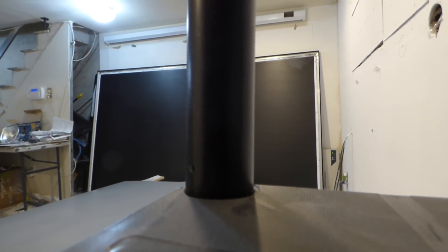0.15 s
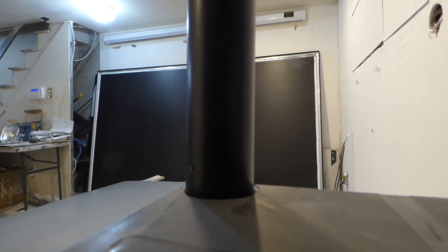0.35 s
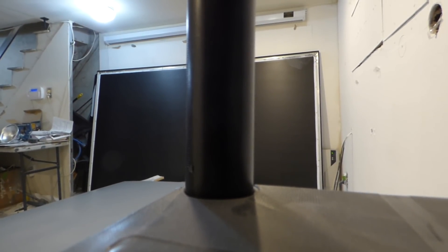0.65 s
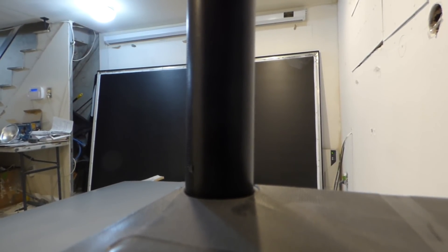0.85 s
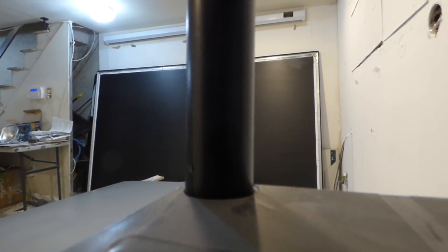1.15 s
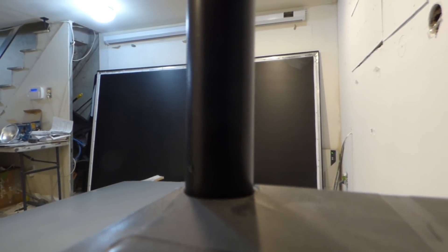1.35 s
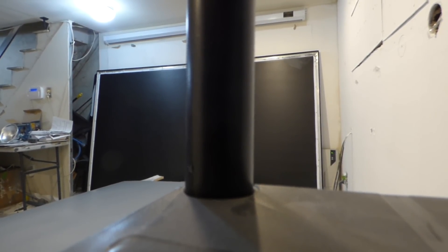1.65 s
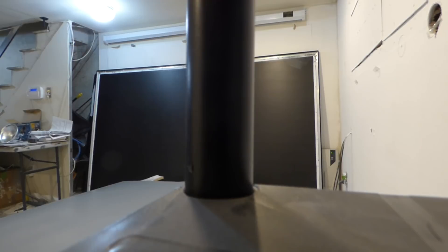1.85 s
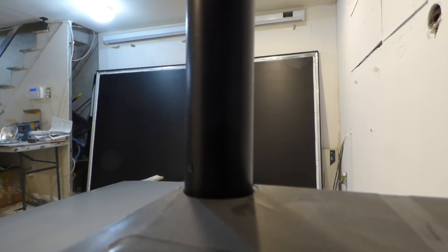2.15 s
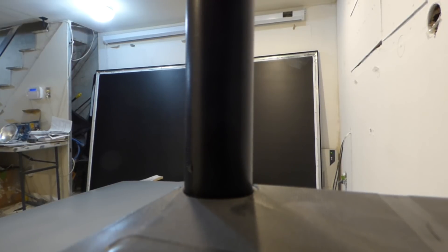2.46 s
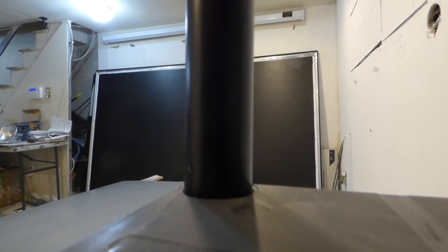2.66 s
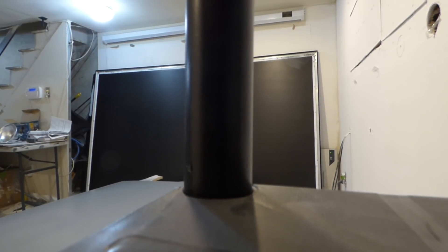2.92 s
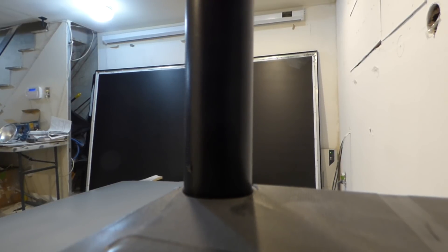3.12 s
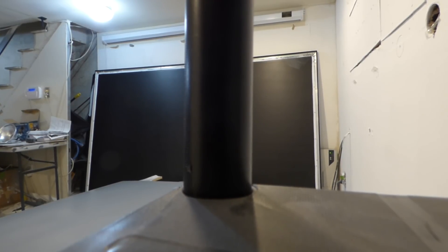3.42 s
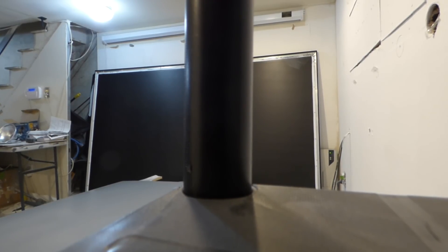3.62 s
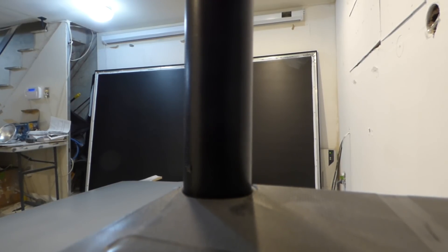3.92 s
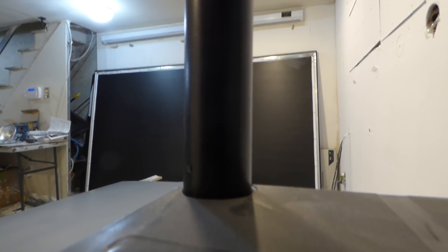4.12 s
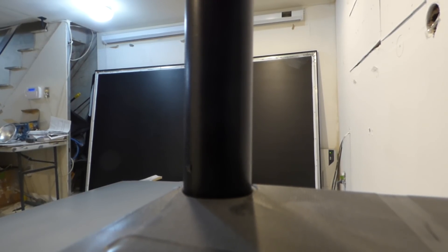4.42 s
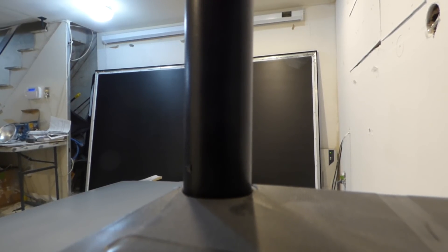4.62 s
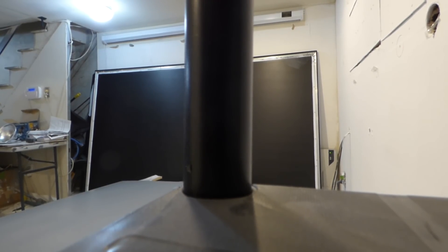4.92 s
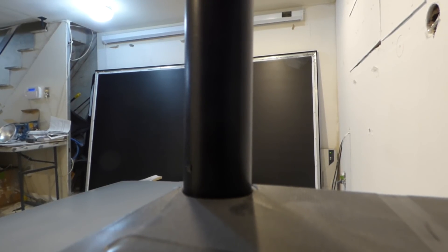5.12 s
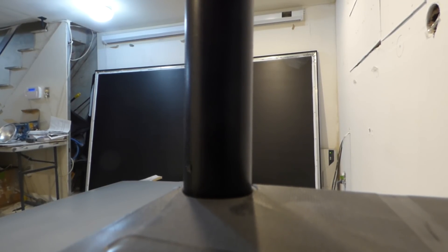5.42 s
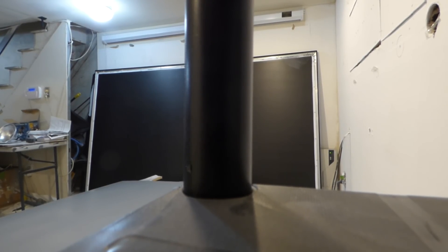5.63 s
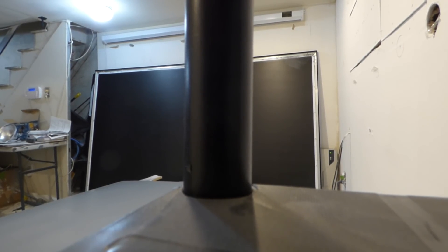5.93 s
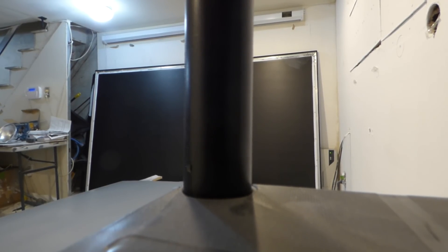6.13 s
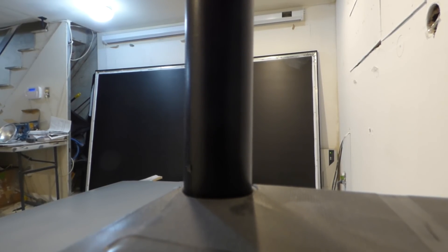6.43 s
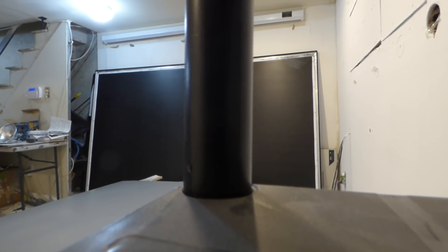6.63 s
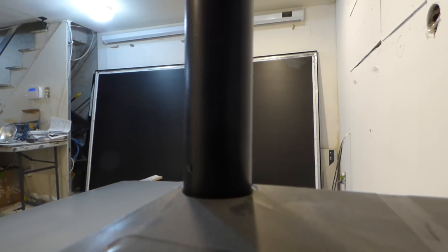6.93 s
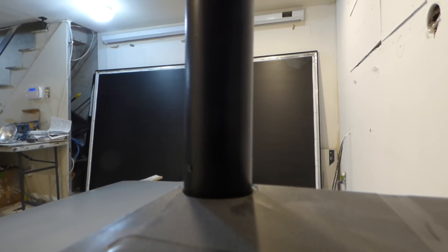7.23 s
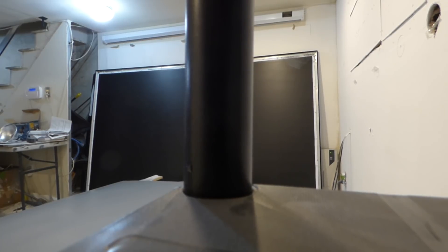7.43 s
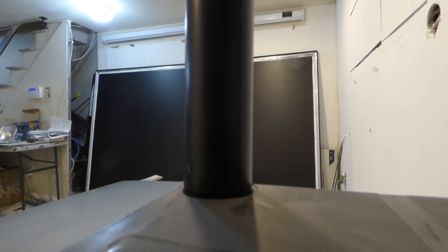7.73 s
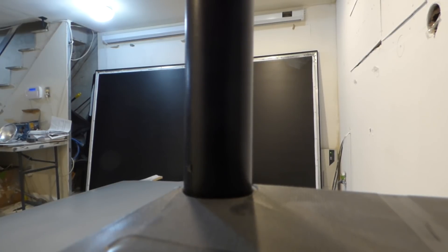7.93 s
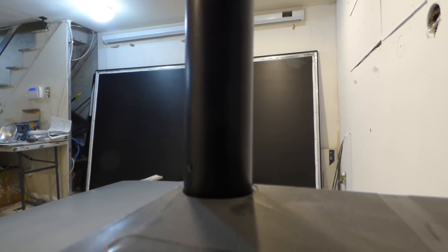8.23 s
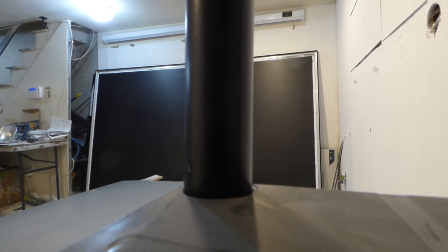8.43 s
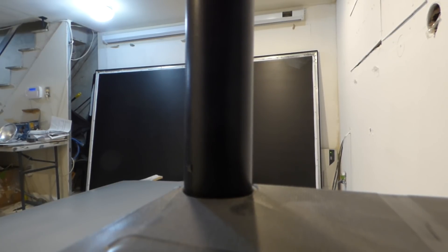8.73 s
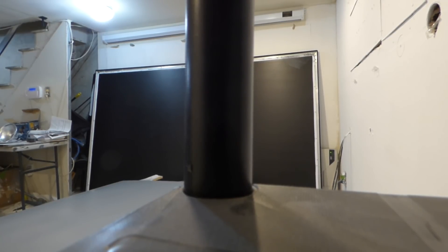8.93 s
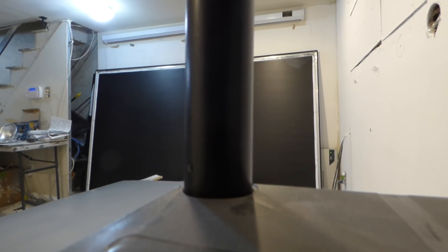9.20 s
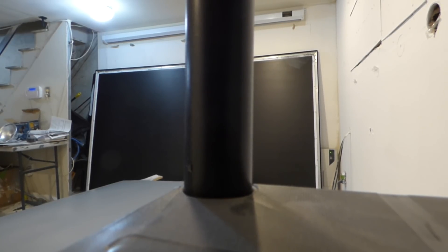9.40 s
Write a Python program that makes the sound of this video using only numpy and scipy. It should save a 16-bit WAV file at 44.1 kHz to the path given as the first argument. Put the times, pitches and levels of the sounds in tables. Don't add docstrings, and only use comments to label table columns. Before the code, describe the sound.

For the first 4.1 seconds it is very quiet in a small workshop: faint microphone hiss, low room murk and close handling. Cloth rustle fades from the start; sharp plastic snaps come near 0.4, 0.66, 1.65 and 2.9 seconds, with tiny crackles between. Soft dull bench knocks fall around 0.55, 0.73 and 0.9, faintly near 1.7-1.85, then more firmly at 3.5, 3.75 and just before 4.0, with a short room echo. At 4.11 a switch clicks, a low thump jolts the housing and rings briefly, with a momentary hum and rapid metallic chirp. The turbine's whine glides up, settling at a steady pitch around 700 hertz by about 5.3 seconds. Almost instantly a loud, bright, hissing air jet takes over, wide in its lower body, gently flickering. It continues to the end around 9.5 seconds, easing only slightly, the whine thin beneath it.

```python
import sys
import numpy as np
from scipy import signal
from scipy.fft import rfft, irfft, next_fast_len
from scipy.io import wavfile
from scipy.ndimage import uniform_filter1d

SR = 44100
rng = np.random.default_rng(int(sys.argv[2]) if len(sys.argv) > 2 else 0)


def transcribe(u):
    v = np.clip(np.atleast_2d(u).T, -1, 1)
    q = np.round(v * 32767).astype(np.int16)
    wavfile.write(sys.argv[1], SR, q)


def ratio(d):
    e = np.asarray(d, float) / 20
    return 10 ** e


N = 421596
T = np.arange(N) / SR
FFT = next_fast_len(N)
HZ = np.fft.rfftfreq(FFT, 1 / SR) + 1e-3
SIDES = np.array([[1], [-1]])
START_S, TOP_SPEED_HZ = 4.113, 714.1


def shape(points):
    hz, db = np.transpose(points)
    return np.interp(np.log(HZ), np.log(hz), db)


def bumps(hz, rows):
    return sum(db / (1 + (2 * (hz - centre) / width) ** 2) for centre, width, db in rows)


def band(x, hz, reach):
    edges = np.clip([hz / reach, hz * reach], 300, 13000)
    return signal.sosfilt(signal.butter(3, edges, "band", fs=SR, output="sos"), x)


def decay(t, t60):
    return np.exp(-np.log(1000) * t / t60)


def ring(hz, t60, rise, turns=0):
    t = T[:int(.6 * SR)]
    return (1 - np.exp(-t / rise)) * decay(t, t60) * np.sin(2 * np.pi * (hz * t + turns))


def walk(rate):
    k = int(SR / rate)
    held = np.repeat(rng.standard_normal(N // k + 1), k)
    return 1.325 * uniform_filter1d(uniform_filter1d(held, k), k)[:N]


def stereo_noise(gain, side_db, pan_db=0):
    mid, side = rfft(rng.standard_normal((2, FFT))) * gain / np.sqrt(np.mean(gain ** 2))
    spectrum = (mid + SIDES * ratio(side_db) * side) * ratio(SIDES * pan_db / 2)
    return irfft(spectrum, FFT)[:, :N]


def add(out, s, sound, pan_db):
    i = int(s * SR)
    out[:, i:i + len(sound)] += sound * ratio(SIDES * pan_db / 2)


def speed():
    quick_share, quick_s, slow_s, switch_s = .255, .069, .255, 4.112
    since = np.maximum(T - switch_s, 0)
    lacking = quick_share * np.exp(-since / quick_s) + (1 - quick_share) * np.exp(-since / slow_s)
    return TOP_SPEED_HZ * (1 - lacking)


def tone(multiple, turns, db, lag, pan_db=0):
    return ratio(db + 5 + SIDES * pan_db / 2) * np.sin(2 * np.pi * (multiple * turns + SIDES * lag / 2))


# frequency in Hz, level in dB.
SHAFT_BODY = [(20, -50), (150, -34), (283, -25), (350, -29), (500, -35), (600, -43), (700, -43),
              (714, -41.2)]
# frequency in Hz, width in Hz, left in dB, right in dB.
SHAFT_NULLS = [(314, 14, -11, -11), (402, 30, -32, -32), (566, 20, -26, -20), (652, 7, -9, -9),
               (676, 6, -22, -18), (687, 14, 3, -16), (694.5, 4, -24, -10), (701, 4, -4, 5),
               (706, 2, -5, 2), (714, 10, 0, -8)]


def shaft_tone(hz, turns):
    nulls = np.array(SHAFT_NULLS)
    body_hz, body_db = np.transpose(SHAFT_BODY)
    null_db = np.array([bumps(hz, nulls[:, [0, 1, side]]) for side in (2, 3)])
    sag_db = -3 * np.clip((T - 8.5) * 2, 0, 1)
    at_speed = (hz / hz[-1]) ** 6
    flutter_db = 1.3 * at_speed * walk(22)
    return tone(1, turns, np.interp(hz, body_hz, body_db) + null_db + sag_db + flutter_db, .2 * at_speed)


# multiple of shaft speed, level in dB, left minus right in dB, lag of the right in turns.
OVERTONES = [(2, -57, 0, .2), (3, -63, 0, .1), (5, -57, 0, .05), (6, -58, 0, .05)]


def overtones(turns):
    return sum(tone(k, turns, db + 3.8 * walk(20), lag, pan_db) for k, db, pan_db, lag in OVERTONES)


# frequency in Hz, width in Hz, gain in dB.
CHIRP_RINGS = [(900, 300, 19), (1550, 300, 12), (1960, 210, 18.5), (2430, 290, 29.5)]


def chirp(hz, turns, since):
    steady_db, start_db, current_s = -56.5, 13, 0.088
    db = steady_db + start_db * np.exp(-since / current_s) + bumps(12 * hz, CHIRP_RINGS) + 3 * walk(300)
    octave_db = -37 - 9 * ((T - 4.146) / 0.0097) ** 2
    return tone(12.02, turns, db, .03) + tone(24, turns, octave_db, .03)


def hum(since):
    start_db, end_db, t60_s = -43.5, -72, 1.25
    return (ratio(start_db - 60 * since / t60_s) + ratio(end_db)) * np.sin(2 * np.pi * 120 * T)


def panel():
    turns = np.cumsum(289 + 2 * walk(20)) / SR
    return ratio(-55 + walk(10)) * np.sin(2 * np.pi * turns)


def turbine():
    hz, since = speed(), np.maximum(T - START_S, 0)
    turns = np.cumsum(hz + .8 * walk(30)) / SR
    shaft = shaft_tone(hz, turns) + overtones(turns) + chirp(hz, turns, since)
    return (shaft + hum(since) + panel()) * np.clip(since / 0.017, 0, 1)


AIR_EDGES_HZ = [700, 2200, 5000]
# frequency in Hz, level in dB per Hz.
AIR_MID = [(40, -41), (64, -51), (150, -25), (500, -16.5), (1400, -17.5), (2300, -15), (3300, -12.5),
           (4500, -10.5), (7500, -7), (9500, -3.5), (12500, -9), (14500, -16.5)]
# frequency in Hz, gain in dB.
AIR_TOP = [(14500, 0), (15300, -3), (15700, -11)]
# frequency in Hz, side minus mid in dB.
AIR_SIDE = [(60, 7), (110, 7), (200, -7), (380, 1.5), (700, 4.5), (1290, 0), (2380, -8), (4400, -8),
            (8120, -11.5), (15000, -5.5)]
# frequency in Hz, left minus right in dB.
AIR_PAN = [(60, -9), (110, 15.5), (200, 5.5), (380, 3), (700, 3), (1290, -0.5), (2380, 0), (4400, -2.5),
           (8120, -0.5), (15000, -2.5)]
# frequency in Hz, width
# in Hz, gain in dB.
AIR_RESONANCES = [(287, 34, 7), (371, 45, -9), (1370, 170, 6.5), (1663, 150, 6), (2295, 145, -8.5), (3010, 74, 6.5),
                  (3300, 110, -11), (3900, 73, -3), (4270, 140, 3), (4650, 150, 3), (5800, 150, -6.5), (6250, 190, 4),
                  (6400, 170, -6), (7050, 140, -4.5), (7220, 260, 3), (7960, 120, -8.5), (9020, 100, -3),
                  (9385, 490, 5.5), (9930, 150, -0.5), (10450, 320, 4),
                  (10900, 120, -2.5), (11100, 150, 2), (11600, 150, 2.5), (11850, 150, -2), (12550, 150, 1.5),
            (13080, 120, -3), (13350, 150, 2), (14400, 250, -2), (14750, 200, 1.5), (15050, 100, -3)]
# steady level in dB, start surge in dB, fading of the surge in seconds,
# opening in dB per second, change with the rotor at rest in dB.
FLOWS = [
    (-52.5, 24.5, .05, -300, -0.5),
    (-41.5, 13, 0.2, 220, -0.5),
    (-32.5, 5.5, 0.041, 450, -1),
    (-21.1, 3, .3, 1200, -0.5),
]


def flow_regions(slack):
    open_s = 4.156
    shut, opened = np.maximum(open_s - T, 0), np.maximum(T - open_s, 0)
    sag_db = -0.75 * np.maximum(T - 7.57, 0)
    colour = shape(AIR_MID) + bumps(HZ, AIR_RESONANCES) + shape(AIR_TOP)
    colour = colour - 10 * np.log10(1 + (112 / HZ) ** 6)
    crossovers = [1 / (1 + (hz / HZ) ** 8) for hz in AIR_EDGES_HZ]
    above = [np.ones_like(HZ)] + crossovers + [np.zeros_like(HZ)]
    flows, gust = [], walk(3.11)
    for k, (steady_db, surge_db, surge_s, opening, rest_db) in enumerate(FLOWS):
        db = steady_db + surge_db * np.exp(-opened / surge_s) - opening * np.minimum(shut, .1)
        db = db + rest_db * slack + sag_db
        rough_db = 1.4 * np.exp(-np.abs(T - START_S) / .25) * walk(120)
        flicker_db = 0.16 * gust + 0.48 * walk(25) + rough_db
        gain = ratio(colour) * np.sqrt(np.maximum(above[k] - above[k + 1], 0))
        flows.append(stereo_noise(gain, shape(AIR_SIDE), shape(AIR_PAN)) * ratio(db + flicker_db))
    return flows


def air():
    slack = 1 - speed() / TOP_SPEED_HZ
    rumble, housing, hose, jet = flow_regions(slack)
    alike = rumble.mean(axis=0)
    rumble = alike + np.clip((T - START_S) / 0.18, 0, 1) ** 2 * (rumble - alike)
    rumble = rumble * np.clip((T - START_S - .02) / .03, 0, 1)
    lost_db = -15.5 * slack
    body = signal.sosfiltfilt(signal.butter(3, 10000, fs=SR, output="sos"), jet)
    jet = (body + ratio(lost_db) * (jet - body)) * ratio(-.25 * lost_db)
    return (rumble + housing + hose + jet) * np.clip((T - START_S) / 0.014, 0, 1)


# time in seconds, peak in dB, width in seconds, frequency in Hz.
THUMP = [
    (4.1265, -13, .0068, 214),
    (4.131, -21, .01, 152),
    (4.129, -25, .006, 335),
]
# frequency in Hz, level in dB, t60 in seconds.
JOLT = [(205, -22, 0.14), (251.7, -17, 0.26), (164, -29, 0.15), (118.6, -22.5, 0.18), (550, -26, 0.13)]


def jolt():
    thump = 0
    for s, db, width, hz in THUMP:
        thump = thump + ratio(db) * np.exp(-((T - s) / width) ** 2 / 2) * np.cos(2 * np.pi * hz * (T - s))
    out = np.tile(thump, (2, 1))
    add(out, START_S + .02, sum(ratio(db) * ring(hz, t60, 0.008) for hz, db, t60 in JOLT), 0)
    return signal.sosfilt(signal.butter(4, 100, "high", fs=SR, output="sos"), out)


# start in seconds, peak in dB, lowest-to-upper modes below, t60 in seconds, left minus right in dB;
# the third column is the level of the upper modes over the lowest in dB.
KNOCKS = [(0.546, -38.5, -4, 0.045, 4), (0.579, -52, -9, 0.09, 1.5), (0.727, -39.5, -6, 0.068, 2),
          (0.899, -55, -18, 0.064, -0.5), (1.669, -52, -19, 0.11, 0.0), (1.851, -49, -8, 0.098, 0.0),
          (3.084, -49, -18, 0.09, 0.0), (3.49, -34.5, -5, 0.048, 3), (3.564, -39, -25, 0.068, -1.0),
          (3.748, -37, -7, 0.069, 1.0), (3.983, -29.5, -5.5, 0.048, 3)]
# frequency in Hz, level in dB.
BENCH = [(185, -6), (225, -2.5), (260, -3), (310, -5), (370, -12.5), (440, 0), (520, 2), (590, 0.5),
         (690, -6.5), (830, -5), (950, -11.5), (1130, -12), (1500, -15)]


def knocks():
    out = np.zeros((2, N))
    for s, db, upper_db, t60, pan_db in KNOCKS:
        blow = 0
        for hz, mode_db in BENCH:
            spread, touch, turns = rng.standard_normal(3)
            level_db = mode_db + 2.0 * touch + upper_db * (hz > 400)
            mode_t60 = 1.5 * t60 * (300 / hz) ** 0.83
            blow = blow + ratio(level_db) * ring(hz * (1 + 0.027 * spread), mode_t60, 2.6 / hz, turns)
        add(out, s, ratio(db) * blow / np.max(np.abs(blow)), pan_db)
    return out


# start in seconds, peak in dB, centre in Hz, left minus right in dB.
CRACKLES = [(0.3839, -28.5, 6560, 4), (0.411, -30, 10800, -0.5), (0.547, -43, 1690, 1.0),
            (0.5781, -47, 1900, 1.5), (0.6604, -27.5, 6570, 6), (0.6794, -43, 7540, -0.5),
            (0.7294, -44.5, 1590, 0.0), (0.8999, -50, 5410, 4), (1.068, -36, 3840, 4),
            (1.2805, -42.5, 11800, 1.0), (1.5414, -43, 3570, 5), (1.5773, -45, 6220, 2),
            (1.6094, -46, 5820, 0.5), (1.649, -25.5, 6500, 5), (1.6694, -42, 6080, 0.5),
            (1.8153, -51, 2290, 4), (1.8394, -44, 3700, 1.5), (2.2064, -44.5, 4143, 7),
            (2.8579, -50, 5190, -4), (2.8943, -41, 3500, 6), (2.913, -28, 8400, 4), (2.931, -37, 9200, 6),
            (2.9735, -31.5, 8800, 2), (3.0719, -47, 8620, 1.0), (3.4885, -57, 1550, 0.0),
            (3.5618, -53, 1510, 1.0), (3.75, -54, 1300, 1.0), (3.9827, -35, 4600, 6), (3.985, -43, 1890, 3),
            (4.111, -33, 1580, 4)]


def crackles():
    out = np.zeros((2, N))
    t = T[:4410]
    for s, db, hz, pan_db in CRACKLES:
        snap = rng.standard_normal(len(t)) * decay(t, 0.03)
        burst = band(snap, hz, 1.62) + 0.36 * band(snap, hz / 2.4, 2.4)
        add(out, s, ratio(db) * burst / np.max(np.abs(burst)), pan_db)
    return out


# centre in seconds, level in dB, centre in Hz, width in seconds, spread as a ratio.
BRUSHES = [(0.019, -49, 1840, .06, 1.76), (0.14, -57, 4070, 0.039, 1.04), (0.11, -63, 4800, .06, 1.03),
           (.319, -51, 6000, .005, 1.6), (4.097, -52, 9000, .004, 1.6), (2.43, -59, 6400, 0.011, 1.8),
           (2.6, -67.5, 2000, 0.1, 1.7), (2.4, -77, 4000, .15, 1.04), (2.6, -72, 4950, 0.1, 1.07),
           (0.92, -67, 1100, 0.018, 1.6), (2.18, -63, 6500, 0.0095, 2.2), (4.112, -39, 10000, .003, 2),
           (3.1, -63, 5500, 0.022, 2.2), (3.39, -62, 6000, 0.013, 2.6), (3.742, -59.5, 5100, .014, 1.8)]


def brushes():
    out = np.zeros((2, N))
    for s, db, hz, width, reach in BRUSHES:
        near = slice(max(int((s - .4) * SR), 0), int((s + .4) * SR))
        cloth = band(rng.standard_normal(int(.8 * SR)), hz, max(reach, 1.02))[:len(T[near])]
        out[:, near] += ratio(db) * cloth / np.std(cloth) * np.exp(-((T[near] - s) / width) ** 2 / 2)
    return out


def room(x):
    t = T[:int(.6 * SR)]
    mid, side = rng.standard_normal((2, len(t))) * decay(t, 0.27) * (t > .004)
    side = signal.lfilter(*signal.butter(2, 500, "high", fs=SR), side)
    tail = (mid + 0.71 * SIDES * side) / np.sqrt(np.sum(mid ** 2))
    return x + ratio(-4.5) * signal.fftconvolve(x.mean(axis=0)[None], tail, axes=1)[:, :N]


def handling():
    blows, in_air = knocks(), .4
    near = room(crackles() + brushes() + in_air * blows) + (1 - in_air) * blows
    return signal.sosfilt(signal.butter(2, [140, 11500], "band", fs=SR, output="sos"), near)


# frequency in Hz, level in dB per Hz.
RUSTLE = [(590, -36), (1000, 18), (1380, 2.5), (3400, -4.5), (4000, 4), (4330, -4), (4700, 2), (8970, -4.5),
          (12000, -6.5), (15800, -26)]


def rustle(rustle_db):
    gain = ratio(shape(RUSTLE)) * (HZ > 1200)
    return stereo_noise(gain, -5.5) * ratio(rustle_db + 0.68 * walk(90))


# frequency in Hz, level in dB per Hz.
MURK = [(30, -35), (55, -35), (80, -17.5), (120, -13.5), (213, -10.5), (290, -12.5), (367, -24.5),
        (549, -18.5), (700, -21), (1300, -27), (2500, -37.5), (5500, -60)]


def murk(rustle_db):
    low_db = -61 + 0.42 * (rustle_db + 66)
    side_db = shape([(60, -35), (300, -8.5), (1000, 1)])
    return stereo_noise(ratio(shape(MURK)), side_db) * ratio(low_db + 0.66 * walk(17))


# time in seconds, rustle in dB.
STIR = [(0.0, -45.5), (0.16, -54.5), (0.33, -63), (0.58, -62), (1.06, -71), (1.59, -62.5), (1.72, -56),
        (1.99, -70.5), (2.22, -66.5), (2.45, -68.5), (2.94, -64.5), (3.16, -72), (4.04, -69), (4.11, -59)]


def stir():
    rustle_db = np.interp(T, *np.transpose(STIR))
    return rustle(rustle_db) + murk(rustle_db)


# frequency in Hz, level in dB per Hz.
HISS = [(900, -30), (1500, -10), (2700, -7), (4000, 3), (6200, -10), (10000, 5.5), (12500, -3), (15800, -9)]


def noise_floor():
    deep = stereo_noise(1 / (1 + (HZ / 45) ** 4), -1) * ratio(-76)
    return deep + stereo_noise(ratio(shape(HISS)), -2.2) * ratio(-71)


def scene():
    return turbine() + air() + jolt() + handling() + stir() + noise_floor()


def low_pass(x):
    return signal.sosfilt(signal.butter(12, 16060, fs=SR, output="sos"), x)


def record(dry):
    cut = signal.sosfilt(signal.ellip(8, .2, 70, 15680, fs=SR, output="sos"), dry)
    return low_pass(cut - .0035)


dry = scene()
out = record(dry)
transcribe(out)
```